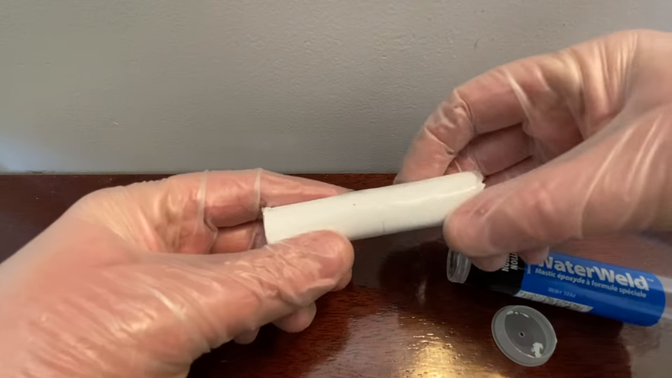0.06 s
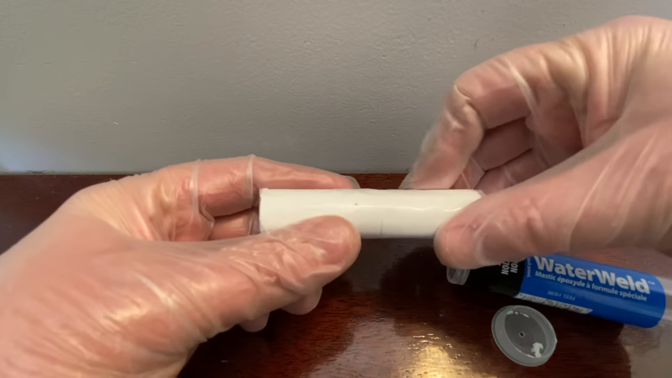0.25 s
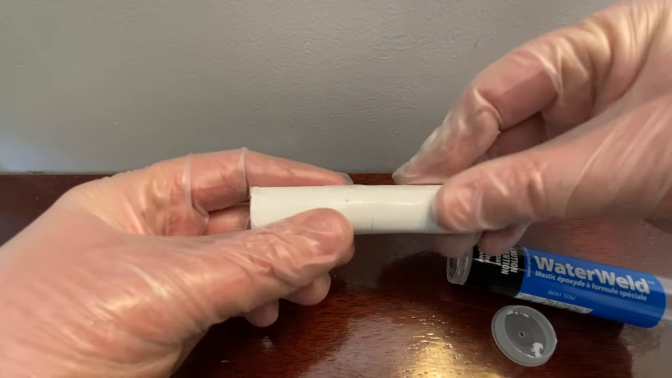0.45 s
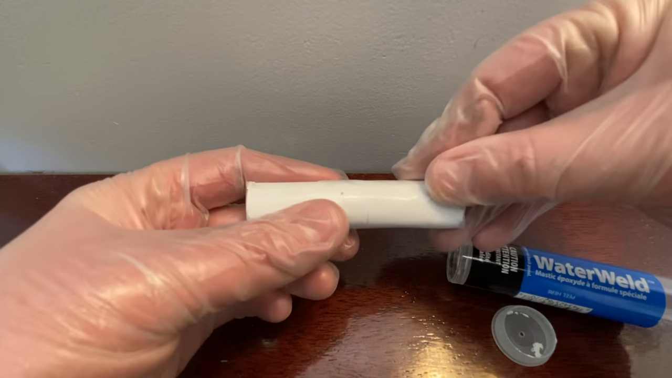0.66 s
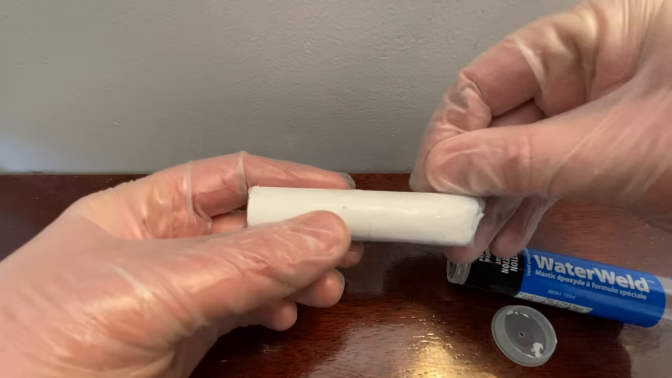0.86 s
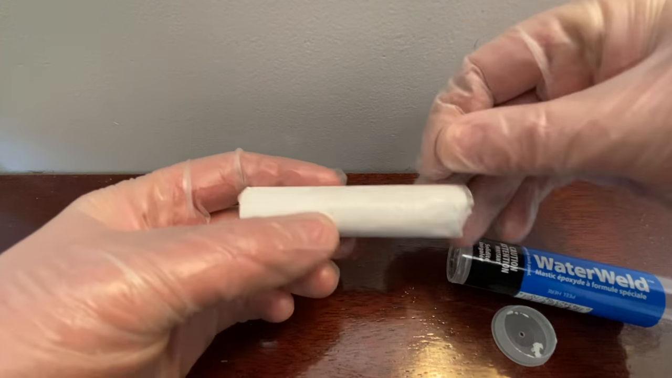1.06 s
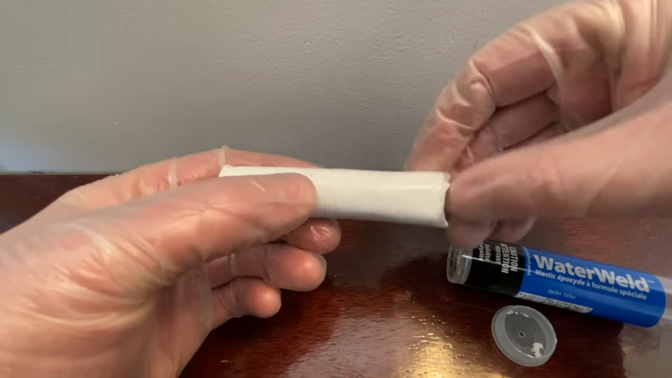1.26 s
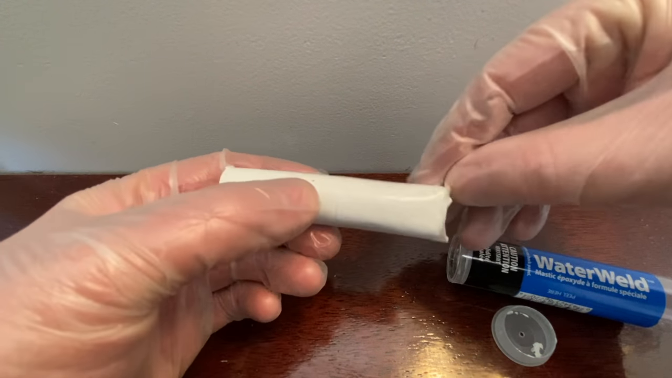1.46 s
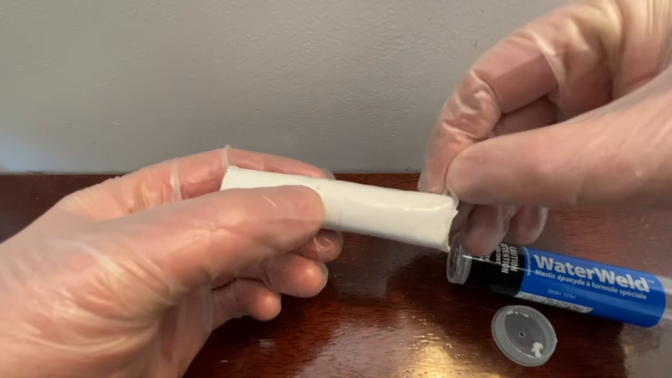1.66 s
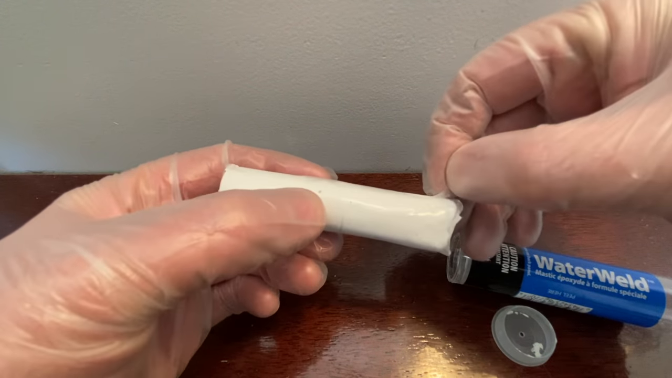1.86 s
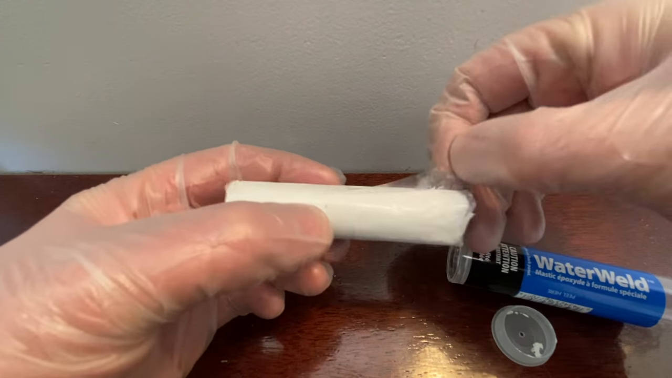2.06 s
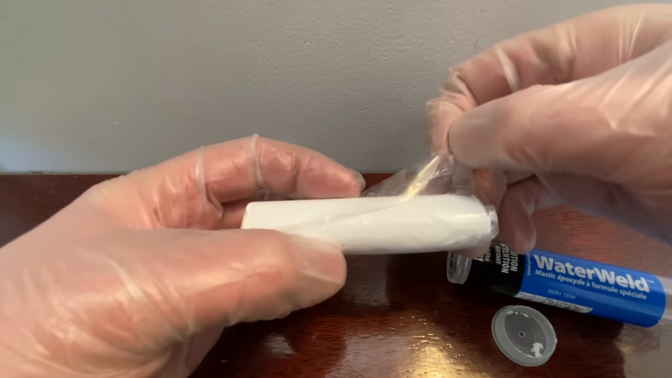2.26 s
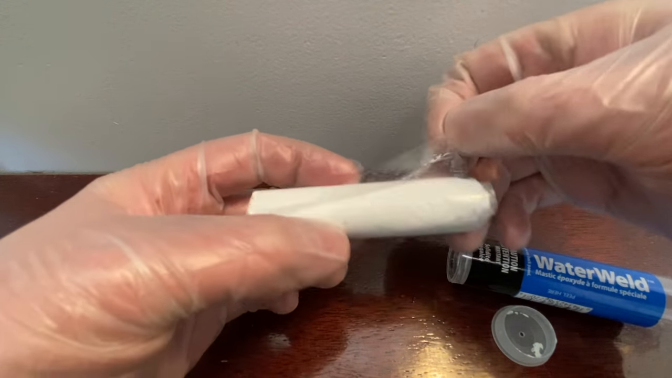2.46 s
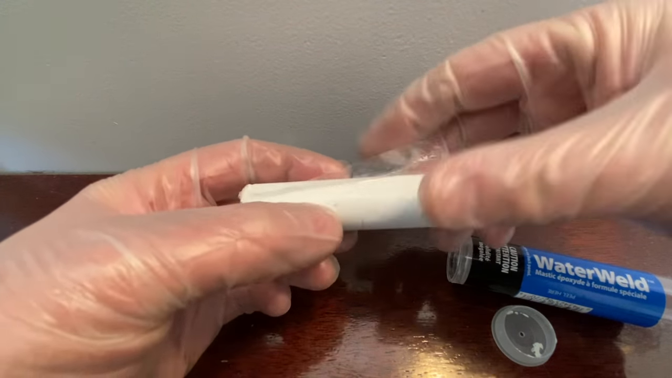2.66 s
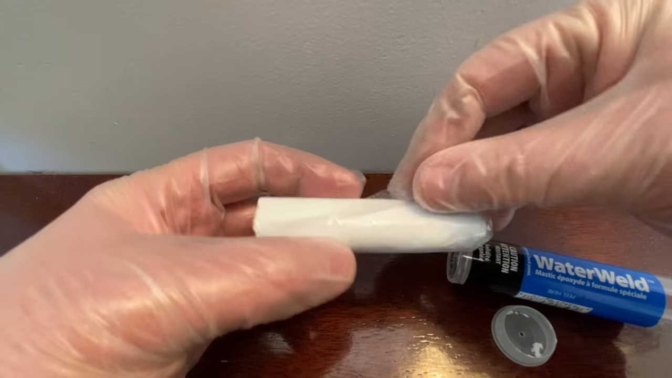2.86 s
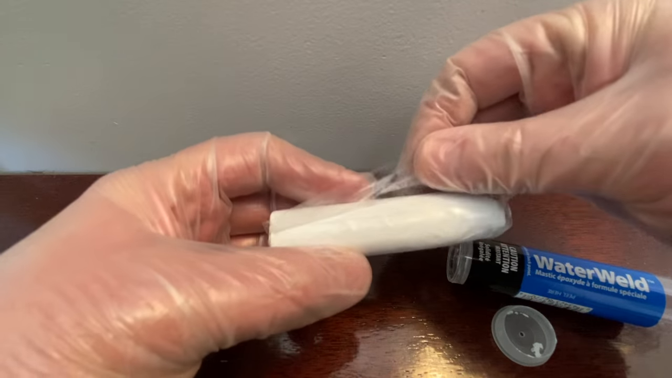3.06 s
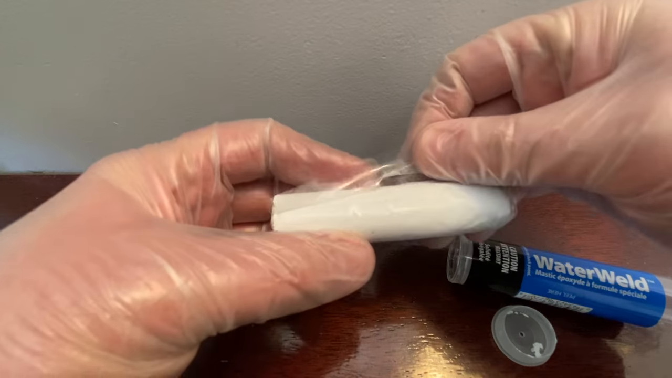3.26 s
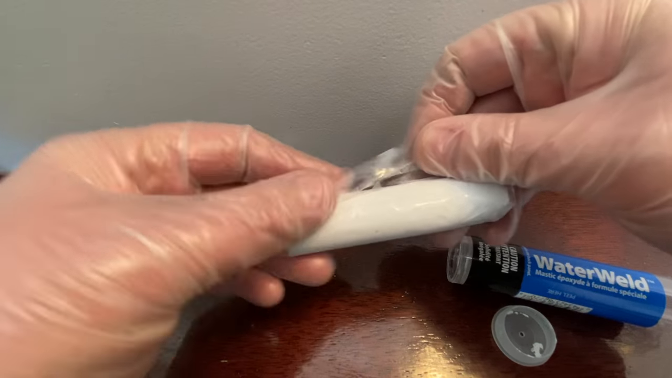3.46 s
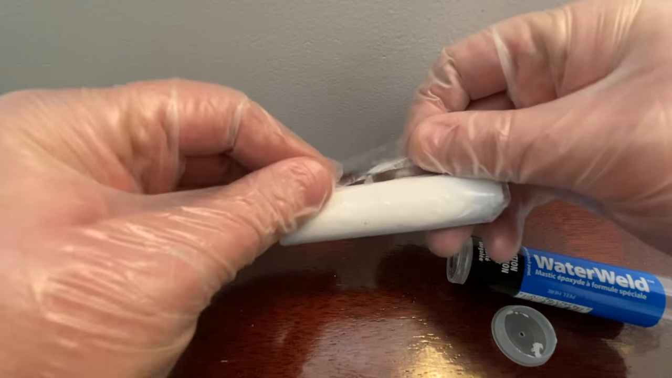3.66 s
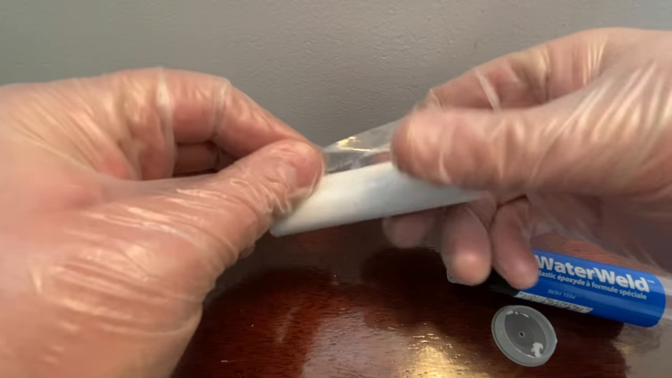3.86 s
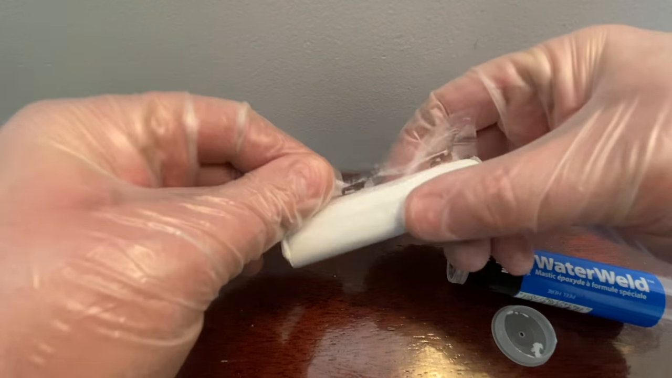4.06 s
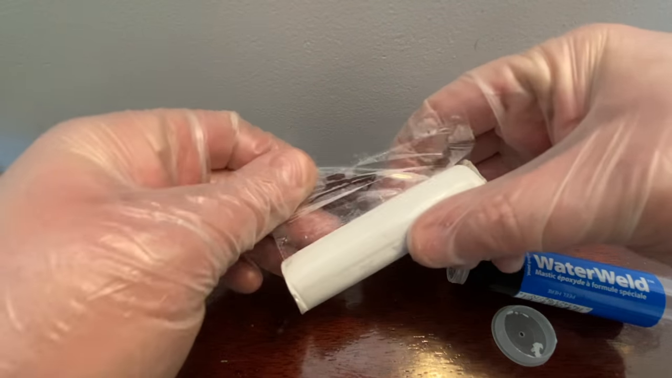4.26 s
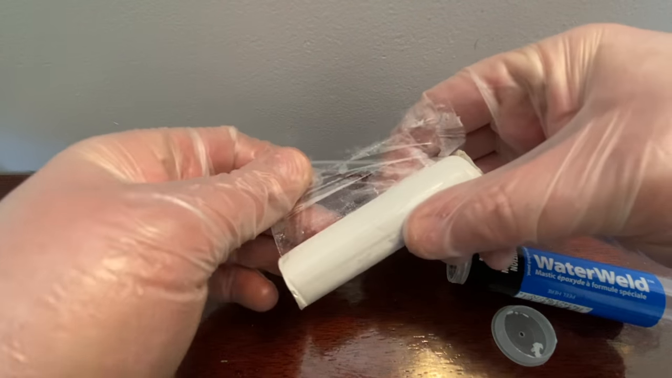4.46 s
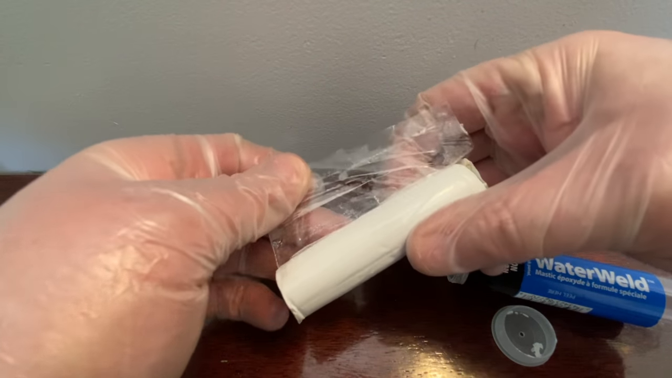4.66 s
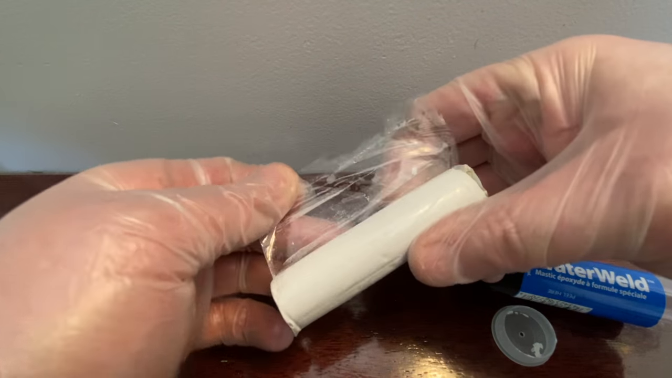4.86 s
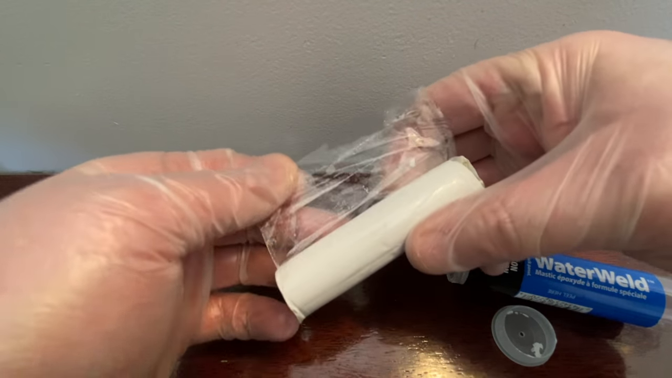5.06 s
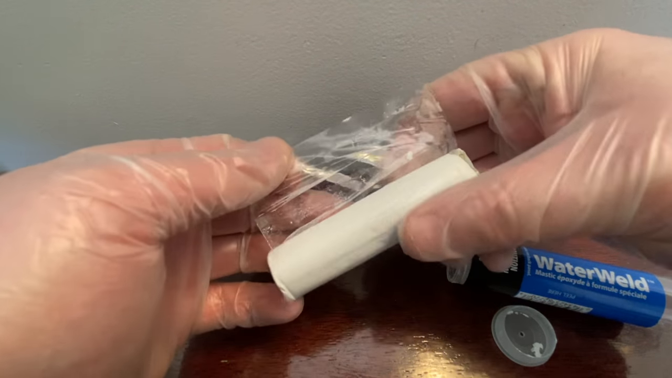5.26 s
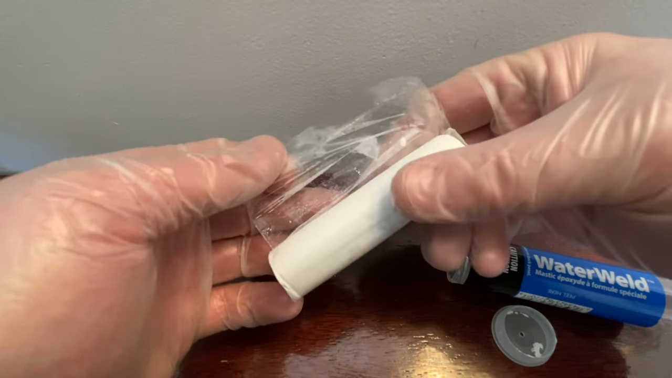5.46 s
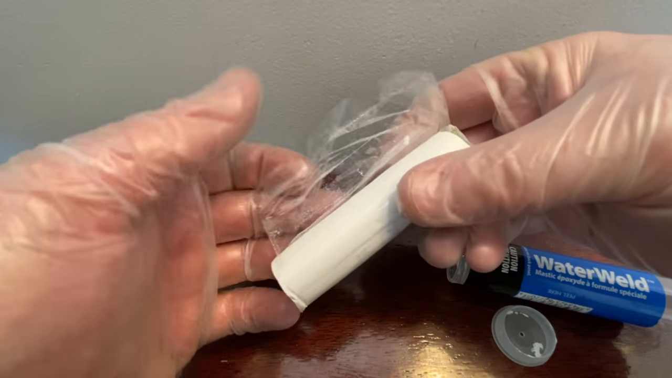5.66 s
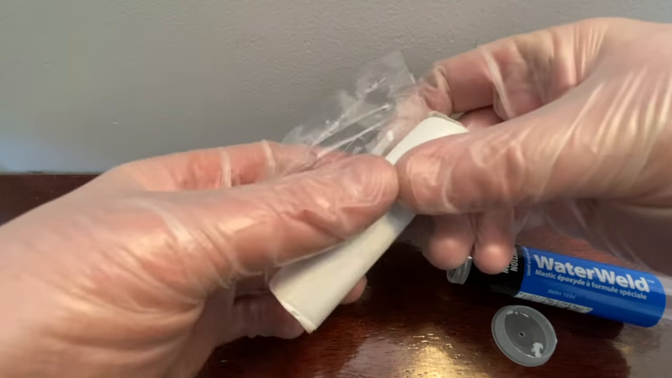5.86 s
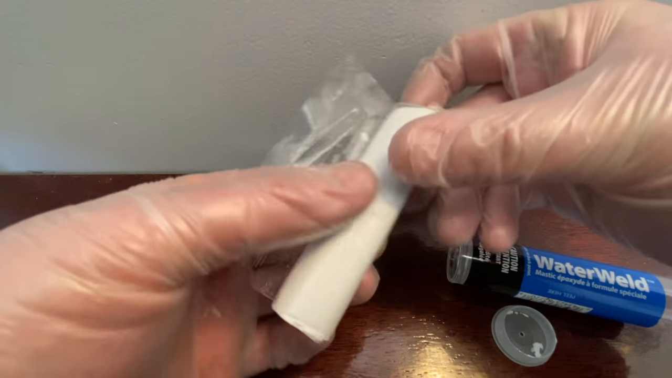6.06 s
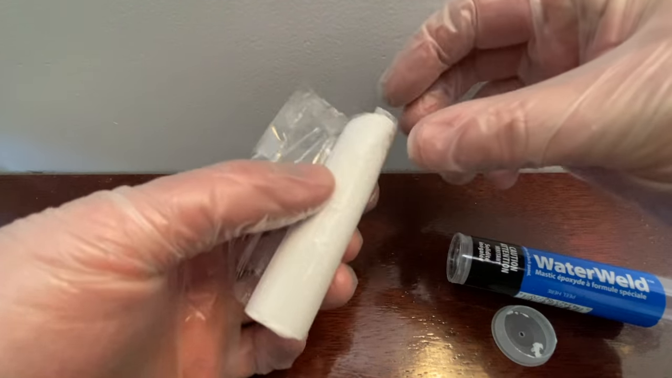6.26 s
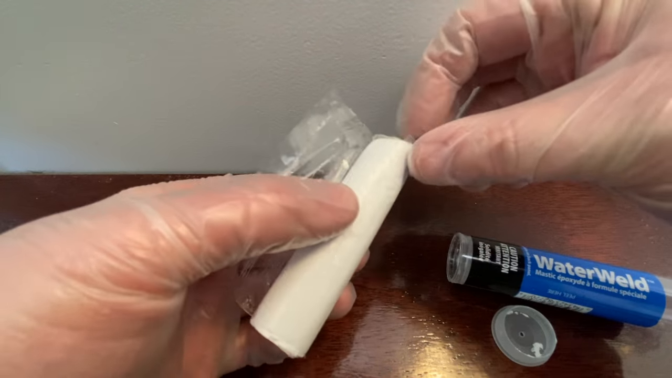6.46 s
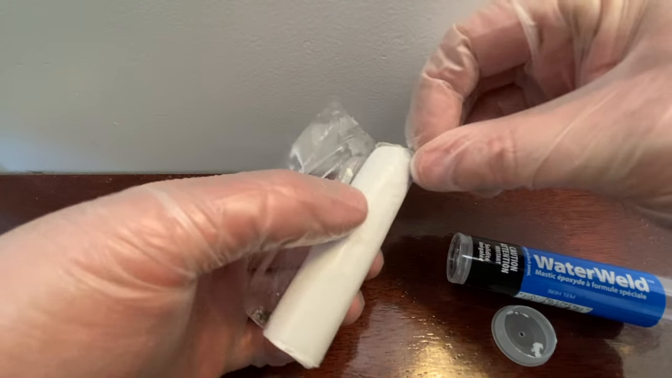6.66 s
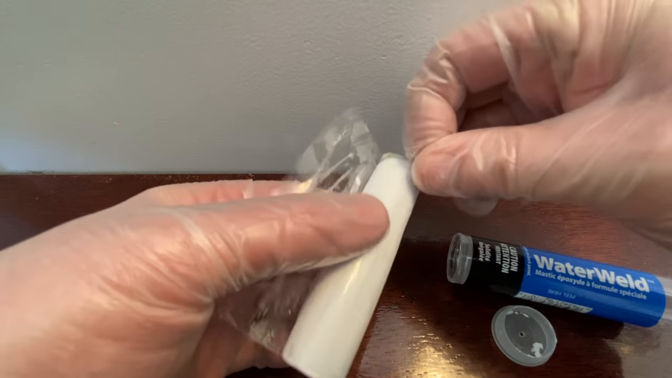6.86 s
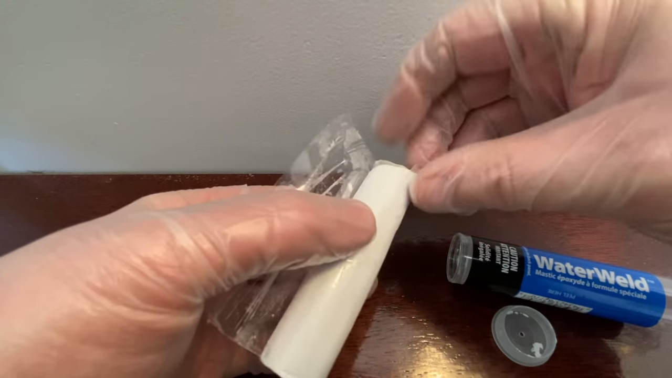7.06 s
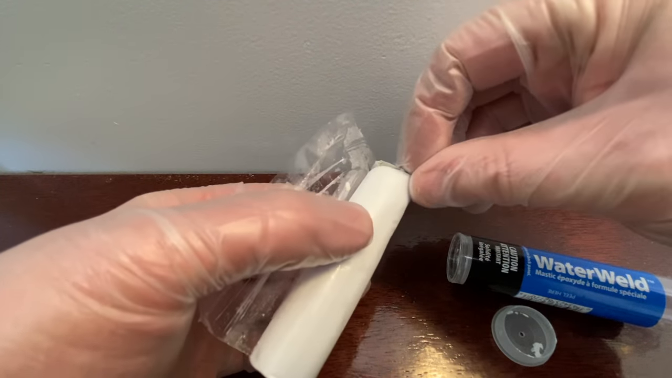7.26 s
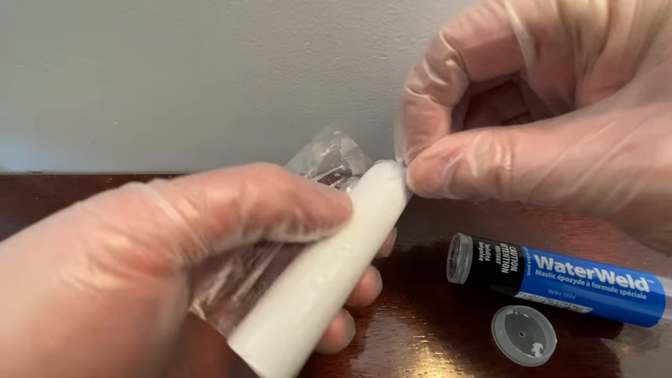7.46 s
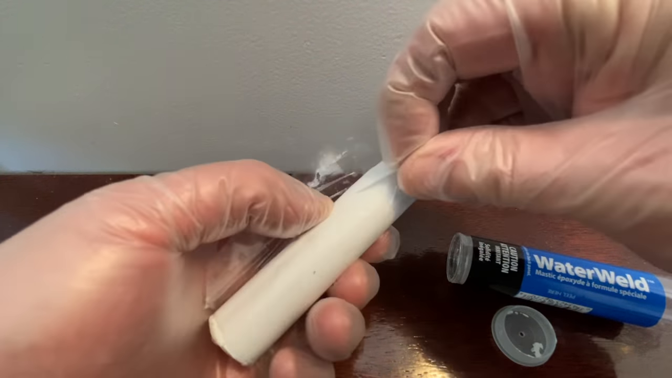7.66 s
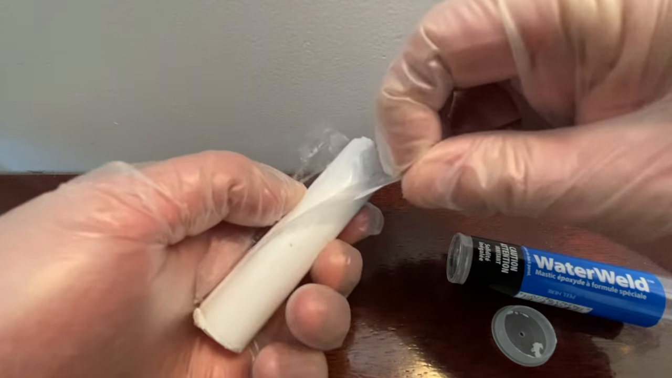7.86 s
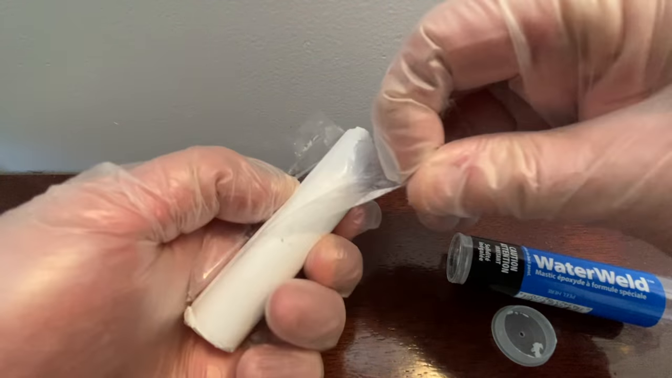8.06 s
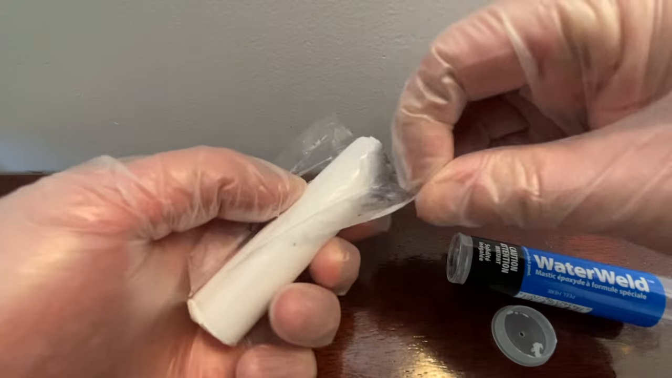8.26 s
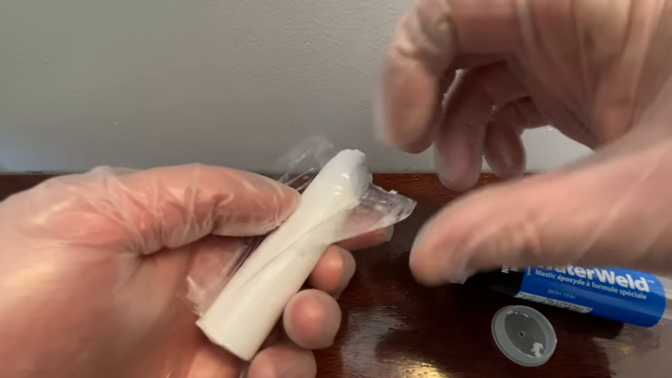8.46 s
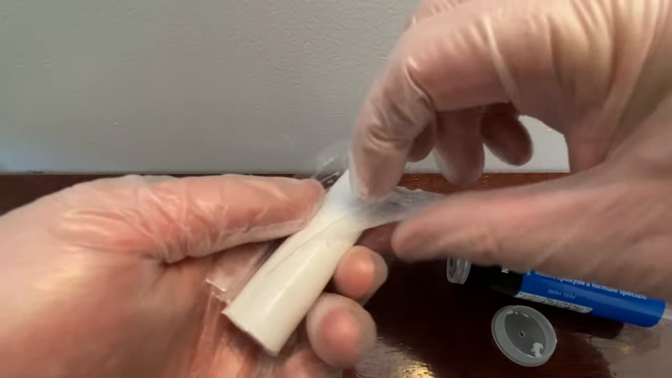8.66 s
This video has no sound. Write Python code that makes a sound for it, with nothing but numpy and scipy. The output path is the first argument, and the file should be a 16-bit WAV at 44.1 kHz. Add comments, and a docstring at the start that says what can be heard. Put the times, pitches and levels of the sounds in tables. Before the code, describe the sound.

Thin plastic film crinkles, ticks and rips in short crackly bursts as gloved fingers peel it from a putty stick in a quiet room.

```python
"""A low room rumble and a faint wavering hum open the scene, with a soft rub of gloves and a first short tick.
Gloved hands peel thin plastic film off a putty stick, close up in a small room; the hum stops after 3 s.
Creases flip with short ticks, made of brief noise bursts sent through resonances; soft bumps are dying sines.
From 2 s on the taut film also rips in quick runs of slips, whose bursts ring it like a small drum.
Rub and fizz are shaped noise that swells with each stroke of a glove."""
import sys
import numpy as np
from scipy import signal
from scipy.fft import rfft, irfft, next_fast_len
from scipy.io import wavfile

SR = 44100
rng = np.random.default_rng(int(sys.argv[2]) if len(sys.argv) > 2 else 0)


def master(y):
    """Save y as 16-bit WAV."""
    cut = np.clip(np.atleast_2d(y).T, -1, 1)
    pcm = np.round(cut * 32767)  # scale
    wavfile.write(sys.argv[1], SR, pcm.astype(np.int16))


N = 384552  # length in samples

# Levels in the tables are set before the left-right balance, the echo and the final rounding of peaks.
# Room rumble: pitch_hz, relative level_db
AIR_COLOUR = [(20, -16.5), (40, -9.5), (60, -1.5), (80, -3), (100, -9), (125, -2), (165, -9.5), (250, -8),
              (320, -20), (450, -29), (700, -44), (1400, -49), (4000, -55.5), (16000, -53.5)]
# Wavering hum, which ends at the last row: time_s, pitch_hz, relative level_db
HUM = [(0.0, 236.9, -50), (1.16, 240.7, -51.5), (3.05, 231.6, -56)]
# Light rubbing of the fingers that hold the film: time_s, level_db
HOLD = [(0, -58.5), (.26, -60.5), (.68, -73), (1.25, -67.5), (1.62, -65.5), (1.95, -76), (2.43, -78),
        (2.6, -63), (3.3, -68), (3.9, -62), (4.68, -70.5), (5.5, -71.5), (6.26, -61.5), (6.36, -84.5),
        (6.62, -64), (7.4, -71), (8.3, -66), (8.7, -65.5)]
HOLD_HZ, HOLD_FIZZ_DB = 2900, -1  # its resonance; its fizz compared with its rub
# Dull rubbing of the glove as the grip shifts: time_s, level_db
GRIP = [(0, -53.5), (.2, -55), (.33, -49.5), (.45, -92)]
# Strokes of a glove over the film: start_s, length_s, rub_db, rub_resonance_hz, fizz_db
STROKES = [(0.411, .09, -54.5, 4393, -58), (.73, .12, -52, 3300, -49.5), (.95, .11, -62, 2497, -55),
           (1.123, .1, -52, 2500, -48.5), (1.281, .07, -55, 3994, -47.5), (1.461, .08, -56.5, 4000, -54),
           (1.73, .17, -67, 3200, -58), (1.98, .14, -60, 3197, -58), (2.69, .18, -49.5, 3000, -48.5),
           (3.009, .06, -48.5, 3300, -60.5), (3.32, .06, -57, 3697, -47.5), (3.392, .2, -57.5, 4000, -57),
           (3.649, .07, -50, 4000, -48), (3.742, .14, -52, 2600, -52), (5.1, 0.082, -46.5, 2900, -63),
           (5.269, .15, -60.5, 2900, -53.5), (5.752, .12, -49, 3493, -47), (5.939, .27, -54.5, 3100, -57.5),
           (6.469, .07, -61.5, 4002, -55.5), (6.72, .14, -47, 3300, -47.5), (6.98, .08, -58, 4494, -52),
           (7.116, .09, -60, 4485, -60), (7.617, .18, -46, 2700, -51.5), (8.199, 0.22, -52.5, 2990, -51.5),
           (8.581, .1, -56, 2302, -51)]
STROKE_CURVE = 1.1  # a stroke swells and fades as a half sine to this power
# Tone of the rub, then of the fizz: pitch_hz, relative level_db
RUB_COLOUR = [(400, -22), (700, -9.5), (1400, -7.5), (2200, -5), (3400, -9.5), (5000, -3.5), (6500, -6.5),
              (8500, -10.5)]
FIZZ_COLOUR = [(4500, -19), (7000, -2.5), (9200, -6), (11000, 5.5), (12300, -2), (13400, -4), (15000, 0),
               (16500, -3.5)]
# The louder creases flipping: start_s, body_db, crack_hz, crack_db, sizzle_db (energy as if held for 5 ms)
TICKS = [(0.009, -59, 2600, -35, -34), (0.452, -79, 4830, -39.5, -29), (0.774, -62, 2410, -31, -39),
         (0.958, -53, 2073, -42.5, -36), (1.326, -68, 6000, -49, -37), (1.648, -69, 6100, -52.5, -38),
         (1.835, -72, 6110, -43.5, -34.5), (1.988, -65, 3400, -41, -34), (2.004, -54, 1680, -39, -42),
         (2.021, -45.5, 3670, -33, -31.5), (2.057, -52, 1660, -36, -47), (2.086, -46, 2550, -32.5, -34),
         (2.098, -55, 2350, -31, -33), (2.176, -44, 1600, -43, -39), (2.31, -52, 3800, -37.5, -41.5),
         (2.489, -43, 4000, -48, -50), (2.53, -45, 3370, -43, -40), (2.731, -42, 2680, -34, -33.5),
         (2.865, -44.5, 5050, -33, -27), (3.238, -55.5, 3340, -40, -43.5), (3.779, -44.5, 2610, -36, -36),
         (3.795, -38, 2430, -42, -45), (4.165, -41, 4700, -26.5, -31), (4.214, -39.5, 1980, -28, -27),
         (4.623, -57, 4000, -47, -44), (5.105, -51, 3560, -37, -36), (5.775, -39.5, 1600, -39.5, -40.5),
         (5.838, -43.5, 4130, -36.5, -39.5), (7.014, -51, 2445, -35.5, -31),
         (7.021, -54, 5400, -39.5, -27.5), (7.465, -50.5, 5275, -35.5, -20),
         (7.635, -46.5, 2527, -39.5, -51), (8.291, -50, 5490, -34.5, -30.5),
         (8.347, -38.5, 2100, -33, -27.5), (8.357, -40.5, 4730, -33, -30), (8.463, -63, 4000, -49, -47),
         (8.592, -66, 5980, -52, -35)]
# Small creases flip at random during strokes; their levels are counted from the stroke's fizz
SMALL_TICKS_PER_S, SMALL_TICK_SPREAD_DB = 22, 3.5
SMALL_BODY_DB, SMALL_CRACK_DB, SMALL_SIZZLE_DB = -13, 1, 7.0
# Sparse faint creases, counted from a level of their own
IDLE_TICKS_PER_S, IDLE_TICK_DB = 4.5, -57.5
# Tone of the late echo: pitch_hz, relative level_db
ECHO_COLOUR = [(200, 8), (500, -4), (1000, 6), (2000, -3), (3500, -.5), (7000, 3.5), (11000, -1.5),
               (16000, -7)]
# Time the late echo takes to fall by 60 dB: pitch_hz, decay_s
ROOM_T60 = [(200, .6), (1000, 0.32), (4000, 0.38), (8000, 0.22), (16000, 0.34)]
# Soft bumps of the hands and the stick: start_s, relative level_db, pitch_hz
BUMPS = [(0.432, -30, 76.2), (2.294, -31.5, 76), (2.526, -35, 78), (4.253, -25, 439), (5.275, -39.5, 345),
         (5.399, -45.5, 250)]
# Rips of the taut film, with the drum values before the build-up and weakening set below:
# start_s, slips (count), gap_s, drum_hz, drum_db, crack_hz, crack_db, sizzle_db (energy as if held for 5 ms)
RIPS = [(2.0734, 1, 0, 705, -35.5, 2340, -39, -33.5), (2.1832, 7, 0.0047, 860, -20, 4000, -22, -21.5),
        (2.3235, 1, 0, 1070, -39, 1600, -50, -54), (3.0402, 4, 0.0042, 600, -20.5, 3400, -12.5, -16),
        (3.956, 3, 0.0019, 1100, -24, 3700, -17, -16), (4.044, 2, 0.0043, 1075, -29, 3300, -17, -15),
        (4.076, 1, 0, 1310, -44, 6000, -21, -21.5), (4.087, 1, 0, 940, -45.5, 4600, -14, -23),
        (4.1216, 4, 0.003, 748, -20, 4300, -11.5, -17), (4.2475, 4, .004, 880, -15.5, 1900, -13.5, -17),
        (4.7157, 1, 0, 650, -36.5, 2620, -32, -34), (4.7864, 1, 0, 728, -26, 3440, -22.5, -22.5),
        (4.882, 3, 0.0011, 570, -11, 3600, -10.5, -18), (5.3995, 1, 0.0018, 480, -39.5, 1601, -51, -51),
        (5.6363, 1, 0, 1060, -39, 1610, -40.5, -57), (5.665, 1, 0, 680, -32.5, 1600, -36, -48.5),
        (7.7184, 7, 0.0058, 1034, -20, 3590, -20.5, -19), (7.9622, 1, 0, 1190, -33, 3040, -23.5, -20.5)]
# Ways the taut film rings: pitch (multiple of the drum pitch), relative level_db, time to fall by 60 dB (s)
DRUM_MODES = [(.77, -6.5, 0.021), (1, 3, .034), (1.28, -6, .03), (1.66, -15.5, .02)]
DRUM_BUILD_DB, DRUM_FALL_OCTAVES = 10.5, .2  # a rip frees more and more film: its note grows and sinks
CRACK_BUILD_DB = 2.5  # the crack grows with the drum note
SPENT_DB = 3.5  # the last slip of a long rip is this much weaker, as the pull is spent
SLIP_JITTER, CRACK_SCATTER_OCTAVES = .08, .25  # random spread: share of the gap; pitch of the crack
SLIDE_SHARE, LAST_SLIDE_S = .6, 0.00069  # a slip slides for this share of the gap; the last for a set time
DRUM_PAN_DB, DRUM_PAN_DB_PER_OCTAVE = 1.5, -6  # left minus right at 1 kHz; deeper notes lean left
FLAP_DB = -23.0  # dull flap of the sheet, compared with the drum note
LEVEL_WINDOW_S = .005  # a short sound gets the energy of its level held this long
SNAP_TIME = np.arange(3072) / SR  # clock of a short sound, in s
CUTOFF_HZ = 16100  # top of the finished sound


def from_db(db):
    """Turns decibels into a gain."""
    return 10 ** (np.asarray(db) / 20)


def rms_one(x):
    """Scales a sound to an average strength (rms) of 1."""
    return x / np.sqrt(np.mean(x ** 2) + 1e-20)


def in_time(rows):
    """Draws each column of a table as a curve with a value at every sample."""
    s, *columns = np.transpose(rows)
    return [np.interp(np.arange(N) / SR, s, column) for column in columns]


def at_hz(points, hz):
    """Reads a table at a pitch, with pitch on a log scale."""
    table = np.array(points)
    return np.interp(np.log(hz), np.log(table[:, 0]), table[:, 1])


def add(out, s, sound):
    """Mixes a stereo sound in at time s."""
    i = max(int(s * SR), 0)
    out[:, i:i + sound.shape[1]] += sound[:, :N - i]


def band(x, low_hz, high_hz, order=2):
    """Keeps the part of a sound between two pitches."""
    edges = [low_hz, min(high_hz, .45 * SR)]
    return signal.sosfilt(signal.butter(order, edges, "band", fs=SR, output="sos"), x)


def resonance(x, hz, width_hz):
    """Rings at one pitch, with gain 1 at the peak; a narrower width rings longer."""
    r = np.exp(-np.pi * width_hz / SR)
    feed = np.array([1, 0, -1]) * (1 - r * r) / 2
    return signal.lfilter(feed, [1, -2 * r * np.cos(2 * np.pi * hz / SR), r * r], x)


def coloured(x, spectrum):
    """Gives a steady sound the tone of a table, fading beyond its ends; rms 1."""
    size = next_fast_len(N)
    hz = np.maximum(np.fft.rfftfreq(size, 1 / SR), 1)
    low_end = 1 + (spectrum[0][0] / hz) ** 4
    high_end = 1 + (hz / spectrum[-1][0]) ** 8
    gain = from_db(at_hz(spectrum, hz)) / np.sqrt(low_end * high_end)
    return rms_one(irfft(rfft(x, size) * gain, size)[:, :N])


def drift(per_s):
    """Wanders at random through this many points a second; rms 1."""
    return rms_one(np.interp(np.arange(N) / SR * per_s, np.arange(8192), rng.standard_normal(8192)))


def stereo_noise(likeness, size):
    """Makes noise whose two sides are alike (1) or independent (0)."""
    mid, side = rng.standard_normal((2, size))
    c = np.clip(likeness, -.99, .99)
    left_right = np.array([[1], [-1]])
    return (np.sqrt(1 + c) * mid + np.sqrt(1 - c) * side * left_right) / np.sqrt(2)


def panned(db):
    """Gives the gains of left and right for a level difference of left minus right."""
    return from_db(np.array([[db], [-db]]) / 2)


def arrive(x, pan_db, lag_s):
    """Sets level and delay between the two sides; a positive lag means that the left leads."""
    shift = lag_s * SR / 2
    delays = np.array([[shift - abs(shift)], [-shift - abs(shift)]])
    turn = np.exp(2j * np.pi * np.fft.rfftfreq(x.shape[1]) * delays)
    return irfft(rfft(x) * turn, x.shape[1]) * panned(pan_db)


def at_level(x, db):
    """Gives a short sound, on each side, the energy of that level held for 5 ms."""
    energy = np.sum(x ** 2, axis=1, keepdims=True) + 1e-20
    return x * from_db(db) * np.sqrt(LEVEL_WINDOW_S * SR / energy)


def background():
    """Room rumble with one booming resonance, and a sine hum that wavers in pitch and fades out."""
    air = from_db(-50.5) * coloured(stereo_noise(0.65, size=N), AIR_COLOUR)
    boom = stereo_noise(.92, size=N)
    for _ in range(2):
        boom = resonance(boom, 78.5, 16)
    boom = from_db(-47.5) * rms_one(boom)
    hz, db = in_time(HUM)
    fade = np.clip((HUM[-1][0] - np.arange(N) / SR) / 0.033, 0, 1)
    cycles = np.cumsum(hz + 1.6 * drift(25)) / SR
    hum = from_db(db + 2.5) * fade * np.sin(2 * np.pi * cycles)
    return air * panned(.6) + boom * panned(2.2) + hum


def sliding():
    """Strokes swell out of the light rubbing: gain of the rub, its resonance in Hz, gain of the fizz."""
    t = np.arange(N) / SR
    power = from_db(in_time(HOLD)[0]) ** 2
    weighted_hz = power * HOLD_HZ
    fizz_power = power * from_db(HOLD_FIZZ_DB) ** 2
    for start, length_s, rub_db, hz, fizz_db in STROKES:
        during = (t > start) & (t < start + length_s)
        swell = np.abs(np.sin(np.pi * (t[during] - start) / length_s)) ** STROKE_CURVE
        rub_power = (swell * from_db(rub_db)) ** 2
        power[during] += rub_power
        weighted_hz[during] += rub_power * hz
        fizz_power[during] += (swell * from_db(fizz_db)) ** 2
    return np.sqrt(power), weighted_hz / power, np.sqrt(fizz_power)


def rub(centre_hz, patchy_db, peak_db, peak_octaves):
    """Friction noise rings the film; the strongest resonance moves with the grip, the others come and go."""
    edges = np.geomspace(400, 8500, 23)
    grains = [stereo_noise(0.15, size=N) * from_db(3.7 * drift(600).clip(-2.5, 2.5)) for _ in range(2)]
    out, power = 0, 0
    for k, (low, high) in enumerate(zip(edges, edges[1:])):
        hz = np.sqrt(low * high)
        peak = np.exp(-(np.log2(hz / centre_hz) / peak_octaves) ** 2)
        gain = from_db(at_hz(RUB_COLOUR, hz) + peak_db * peak)
        out = out + band(grains[k % 2], low, high) * gain * from_db(patchy_db * drift(22))
        power = power + gain ** 2 * (high - low)
    return rms_one(out / np.sqrt(power))  # a moving peak leaves the level nearly even


def friction(colour, grain_db, likeness):
    """Countless tiny catches of uneven strength, as noise with a rough level."""
    grain = from_db(grain_db * drift(830).clip(-2.5, 2.5))
    return coloured(stereo_noise(likeness, size=N) * grain, colour)


def wrinkles(per_s, spread_db):
    """Tiny wrinkles pop in clusters, each ringing at one of nine pitches; rms 1."""
    born = rng.random(N) < per_s * from_db(6 * drift(18)) / SR
    pops = born * rng.choice([-1, 1], N) * from_db(spread_db * rng.random(N))
    pitches = np.geomspace(2400, 15000, 9)
    dealt = rng.integers(0, len(pitches), N)
    out = 0
    for k, hz in enumerate(pitches):
        out = out + resonance(pops * (dealt == k), hz, 990) * panned(rng.normal(0, 3.3))
    return rms_one(out)


def gloves():
    """Sliding gives a soft rub, with a fine fizz and tiny pops where the film wrinkles."""
    rub_gain, centre_hz, fizz_gain = sliding()
    slide = rub_gain * rub(centre_hz, patchy_db=3.0, peak_db=8.0, peak_octaves=.35)
    fizz = fizz_gain * friction(FIZZ_COLOUR, grain_db=3.0, likeness=0.056)
    pops = fizz_gain * from_db(-9) * wrinkles(per_s=260, spread_db=14.0)
    grip = from_db(in_time(GRIP)[0]) * rms_one(band(stereo_noise(0.62, size=N), 190, 300))
    return slide * panned(.8) + fizz * panned(-.4) + pops + grip


def flutter(decay_s, likeness, hold_s=0):
    """A release sends bending waves through the film: a dense burst that dies once the film stops slipping."""
    rise = (1 - np.exp(-SNAP_TIME / 0.00035)) ** 2
    fall = np.exp(-np.maximum(SNAP_TIME - hold_s, 0) / decay_s)
    sag = 1 / (1 + np.minimum(SNAP_TIME, hold_s) / .004)  # the pull eases while the film gives
    return np.tanh(stereo_noise(likeness, size=len(SNAP_TIME))) * rise * fall * sag + 1e-18


def sizzle(decay_s, hold_s, fineness_db):
    """The smallest facets ring in the top treble; the finer the snap, the more its highest ring leads."""
    burst = flutter(decay_s, 0.99, hold_s)
    top = from_db(-1.5 + 0.73 * np.clip(fineness_db, -5, 14))
    ring = .5 * band(burst, 6500, 12000) + resonance(burst, 11000, 1500) + top * resonance(burst, 15100, 1400)
    return arrive(ring, pan_db=0, lag_s=rng.uniform(-0.00011, -0.00006))


def small_ticks():
    """Faint creases flip by chance, thick in the strokes and sparse elsewhere; rows like those of TICKS."""
    rows = []
    spells = [(start, length_s, SMALL_TICKS_PER_S, fizz_db) for start, length_s, _, _, fizz_db in STROKES]
    spells += [(start, 1, IDLE_TICKS_PER_S, IDLE_TICK_DB) for start in range(int(N / SR))]
    for start, length_s, per_s, level_db in spells:
        for chance, when, size, pitch in rng.random((8, 4)):  # eight chances in each spell
            db = level_db + SMALL_TICK_SPREAD_DB * (2 * size - 1)
            if chance < per_s * length_s / 8:
                rows.append((start + when * length_s, db + SMALL_BODY_DB, 2400 + 3600 * pitch,
                             db + SMALL_CRACK_DB, db + SMALL_SIZZLE_DB))
    return rows


def creases():
    """Each crease is a facet of its own size that flips over and nudges the slack film around it."""
    out = np.zeros((2, N))
    for s, body_db, crack_hz, crack_db, sizzle_db in TICKS + small_ticks():
        kick = flutter(decay_s=0.00047, likeness=0.91)
        body = 0.66 * band(kick, 830, 1200) + resonance(kick, rng.uniform(710, 740), 200)
        burst = flutter(decay_s=0.0012, likeness=0.46)
        crack = 0.12 * band(burst, 1700, 7000) + resonance(burst, crack_hz, 440)
        top = sizzle(decay_s=0.00094, hold_s=0, fineness_db=sizzle_db - crack_db)
        crack_lag_s = rng.uniform(.00005, 0.00045)
        add(out, s, arrive(at_level(body, body_db), pan_db=6.0, lag_s=0.00029))
        add(out, s, arrive(at_level(crack, crack_db), pan_db=4.0, lag_s=crack_lag_s))
        add(out, s, at_level(top, sizzle_db))
    return out


def room(x, early_db, tail_db):
    """Table, hands and wall throw back quick reflections; the diffuse tail dies band by band."""
    t = np.arange(int(.7 * SR)) / SR
    edges = np.geomspace(150, 17000, 13)
    white, tail = rng.standard_normal((2, 2, len(t))), 0
    for k, (low, high) in enumerate(zip(edges, edges[1:])):
        hz = np.sqrt(low * high)
        decay_db = at_hz(ECHO_COLOUR, hz) - 60 * t / at_hz(ROOM_T60, hz)
        tail = tail + band(white[k % 2], low, high) * from_db(decay_db)
    tail = tail * np.clip((t - .004) / 0.0022, 0, 1)
    early = band(stereo_noise(0.9, size=len(t)), 570, 7000, order=1) * np.exp(-t / 0.0082) * (t > .002)
    echo = 0
    for db, part in [(early_db, early), (tail_db, tail)]:
        echo = echo + from_db(db) * part / np.sqrt(np.sum(part ** 2) / 2)
    return signal.fftconvolve(x, echo, axes=1)[:, :N]


def bumps():
    """Soft flesh gives a dull thud of a few cycles: a sine that swells and dies."""
    out = np.zeros((2, N))
    for s, db, hz in BUMPS:
        cycles = hz * SNAP_TIME
        swell = (1 - np.exp(-cycles / 0.74)) * np.exp(-cycles / 3.3)
        thud = np.sin(2 * np.pi * cycles) * swell * (1 - SNAP_TIME / SNAP_TIME[-1])
        add(out, s, from_db(db + 5.0) * thud * panned(1.5))
    return out


def slips():
    """Breaks each rip into nearly even slips: s, slide_s, drum_hz, drum_db, crack_hz, crack_db, sizzle_db."""
    for start, count, gap_s, drum_hz, drum_db, crack_hz, crack_db, sizzle_db in RIPS:
        count = max(int(round(count)), 1)
        for k, (early, scatter) in enumerate(rng.standard_normal((count, 2)) * (count > 1)):
            to_go = count - 1 - k
            stuck = (to_go / max(count - 1, 1)) ** 3.0  # 1 at the start of a run of slips, 0 at the end
            spent_db = SPENT_DB * (to_go == 0 and count > 3)
            slide_s = SLIDE_SHARE * gap_s if to_go else LAST_SLIDE_S * (count > 1)
            yield (start + gap_s * (k - SLIP_JITTER * early), max(slide_s, 0),
                   drum_hz * 2 ** (DRUM_FALL_OCTAVES * stuck),
                   drum_db - DRUM_BUILD_DB * stuck - spent_db,
                   crack_hz * 2 ** (CRACK_SCATTER_OCTAVES * scatter),
                   crack_db - CRACK_BUILD_DB * stuck - spent_db, sizzle_db)


def drum_note(kick, drum_hz):
    """The stretched film rings like a small drum, in several modes at once, when a slip kicks it."""
    ring = at_level(band(kick, 450, 1500), -14)
    for multiple, db, t60 in DRUM_MODES:
        width_hz = np.log(1000) / (np.pi * t60)
        ring = ring + at_level(resonance(kick, drum_hz * multiple, width_hz), db)
    return band(ring, .64 * drum_hz, 2600, order=3)


def tearing():
    """Every slip cracks, sizzles and kicks the drum; in a rip, each slides for part of the gap to the next."""
    out = np.zeros((2, N))
    for s, hold_s, drum_hz, drum_db, crack_hz, crack_db, sizzle_db in slips():
        kick = flutter(decay_s=0.0018, likeness=.93, hold_s=hold_s)
        drum = at_level(drum_note(kick, drum_hz), drum_db)
        flap = at_level(band(kick, 280, 560), drum_db + FLAP_DB)
        burst = flutter(decay_s=0.0012, likeness=0.79, hold_s=hold_s)
        crack = .33 * band(burst, 1400, 7500) + .35 * band(burst, 1400, 3200) + resonance(burst, crack_hz, 750)
        top = sizzle(decay_s=0.00035, hold_s=hold_s, fineness_db=sizzle_db - crack_db)
        lean_db = DRUM_PAN_DB + DRUM_PAN_DB_PER_OCTAVE * np.log2(drum_hz / 1000)
        crack_lag_s = rng.uniform(.0001, 0.00041)
        # the sizzle starts first, then the crack, then the drum
        add(out, s, arrive(drum + flap, pan_db=lean_db, lag_s=0.00017))
        add(out, s - .0002, arrive(at_level(crack, crack_db), pan_db=3.5, lag_s=crack_lag_s))
        add(out, s - .0004, at_level(top, sizzle_db) * panned(-.7))
    return out


def scene():
    """The film and the gloves in the room; only the film's ticks and rips get an added echo."""
    soft = background() + gloves() + bumps()
    film = creases() + tearing()
    return film + room(film, early_db=-14.0, tail_db=-19.8) + soft


def record(dry):
    """The highest peaks are rounded and the top is cut."""
    rounded = 1.334 * np.tanh(dry / 1.353)
    return signal.sosfilt(signal.ellip(10, .2, 70, CUTOFF_HZ, fs=SR, output="sos"), rounded)


dry = scene()
out = record(dry)
master(out)
```